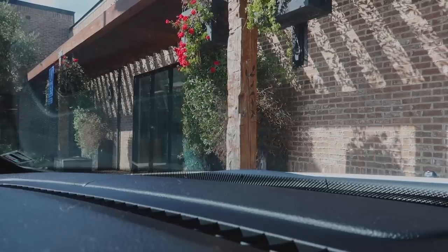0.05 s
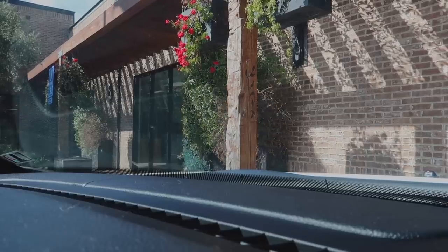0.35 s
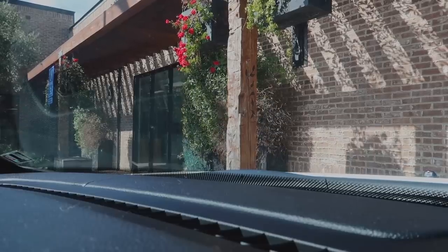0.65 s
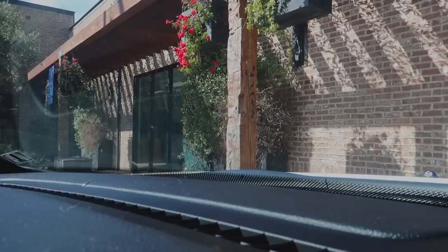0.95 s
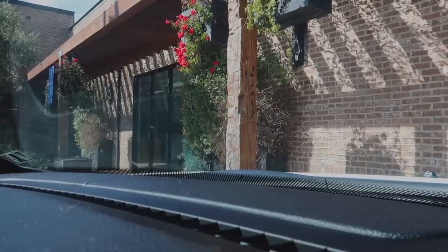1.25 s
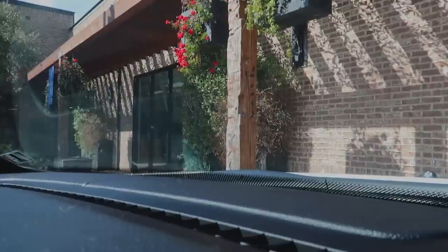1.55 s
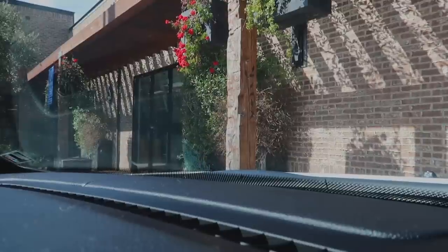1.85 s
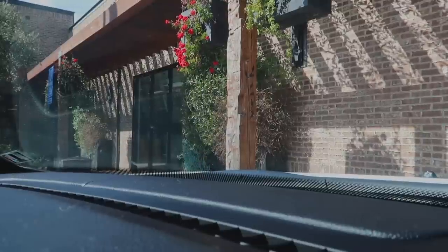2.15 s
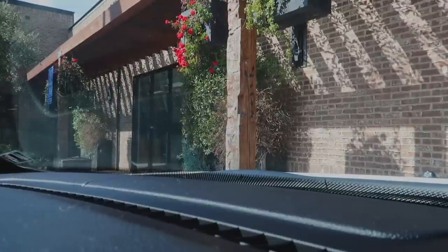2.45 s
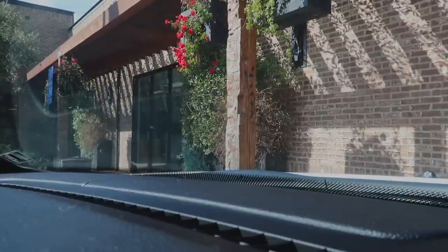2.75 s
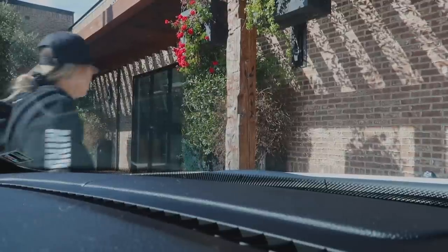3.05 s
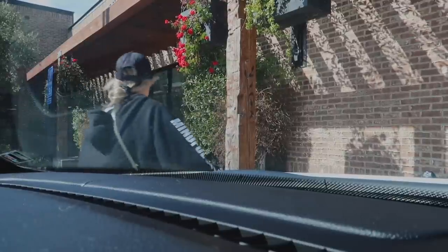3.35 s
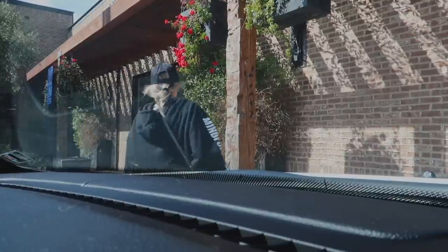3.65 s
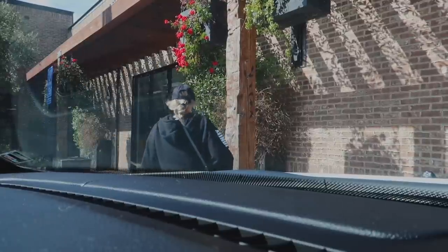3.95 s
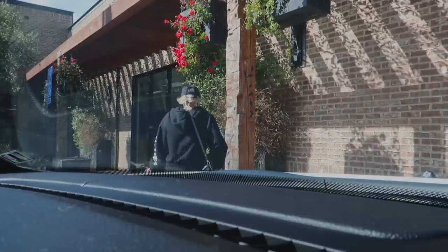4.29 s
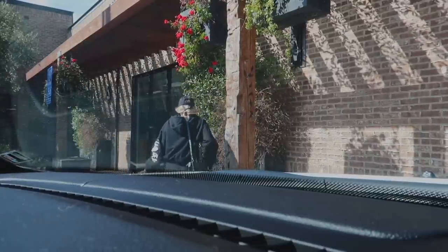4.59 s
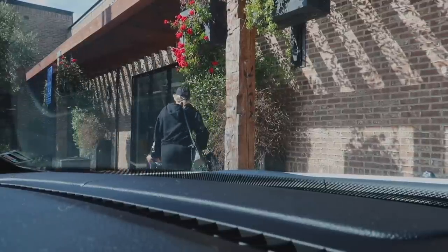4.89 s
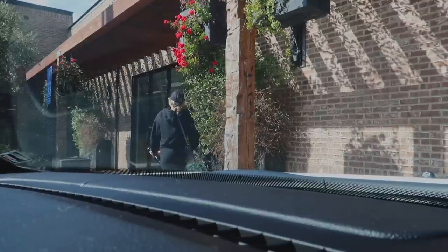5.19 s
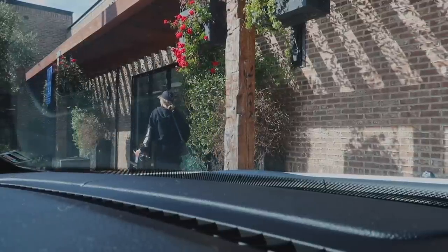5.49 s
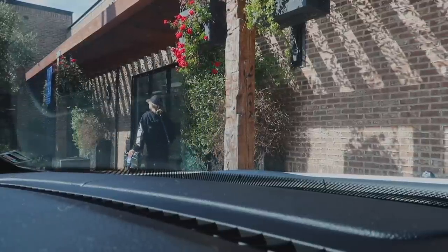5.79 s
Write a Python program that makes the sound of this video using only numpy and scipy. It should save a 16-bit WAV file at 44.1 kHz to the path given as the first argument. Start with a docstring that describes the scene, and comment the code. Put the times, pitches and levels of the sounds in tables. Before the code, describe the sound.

Soft bumps over a low engine hum, then a loud car door slam, rattling locks and a light knock, heard from inside.

```python
"""A car door slams and locks

Inside a parked car the engine idles while someone climbs out with soft bumps, brushes and squeaks.
The door slams: it pushes air in, hits its catches and sets the cabin booming. This overloads the
recorder, whose gain control turns the hum down and lets it creep back. Meanwhile the central locking
clicks, whirrs and clunks, a soft knock follows, and a low drone swells."""
import sys
import numpy as np
from scipy import signal
from scipy.fft import rfft, irfft, next_fast_len
from scipy.io import wavfile
from scipy.ndimage import uniform_filter1d, map_coordinates

SR = 44100
rng = np.random.default_rng(int(sys.argv[2]) if len(sys.argv) > 2 else 0)


def wav_record(signal):
    """Record a signal, one row per channel, as 16-bit PCM in the file named by sys.argv[1]."""
    frames = np.transpose(np.atleast_2d(signal))
    bounded = np.clip(frames, -1, 1)
    # unit amplitude maps onto the largest positive 16-bit level
    quanta = np.round(bounded * 32767).astype(np.int16)
    wavfile.write(sys.argv[1], SR, quanta)


N = 257103
TIME = np.arange(N) / SR
SHUT_S = 1.325  # the door seal closes
FIRING_HZ = 37.63  # engine puffs per second


def amp(db):
    """Turn decibels into a factor to multiply by."""
    return 10 ** (np.asarray(db) / 20)


def unit(x):
    """Scale a sound to an average strength (rms) of 1."""
    return x / np.sqrt(np.mean(x ** 2) + 1e-20)


def along(points, hz):
    """Read between (frequency, value) points, with octaves evenly spaced."""
    freqs, values = np.transpose(points)
    return np.interp(np.log(hz + 1), np.log(freqs + 1), values)


def peaks(resonances, hz):
    """Boost in dB near the frequencies at which a part likes to ring."""
    return sum(boost / (1 + (2 * (hz - centre) / width) ** 2) for centre, width, boost in resonances)


def curves(rows):
    """Join timed points into one curve for each column after the time."""
    times, *columns = np.transpose(rows)
    return [np.interp(TIME, times, column) for column in columns]


def since(s):
    """Seconds gone by since time s, zero before it."""
    return np.maximum(TIME - s, 0)


def wobble(rate):
    """A smooth curve through `rate` random values a second."""
    return map_coordinates(rng.standard_normal(int(N * rate / SR) + 4), [TIME * rate])


def add(track, s, sound):
    """Mix a sound into a track from time s."""
    part = track[..., round(s * SR):][..., :sound.shape[-1]]
    part += sound[..., :part.shape[-1]]


def filtered(x, response):
    """Multiply each frequency in x by response(hz)."""
    n = x.shape[-1]
    padded = next_fast_len(n + 8192, True)
    return irfft(rfft(x, padded) * response(np.fft.rfftfreq(padded, 1 / SR)), padded)[..., :n]


def ring_filter(level_db, size=4096):
    """A filter of energy 1 with the given tone colour that rings only after a blow."""
    cepstrum = irfft(np.log(amp(level_db(np.fft.rfftfreq(size, 1 / SR))) + 1e-6))
    cepstrum[1:size // 2] *= 2
    cepstrum[size // 2 + 1:] = 0
    response = irfft(np.exp(rfft(cepstrum)))
    return response / np.linalg.norm(response)


# how wide the cabin sounds: (frequency [Hz], stereo side minus middle [dB])
STEREO_WIDTH = [(60, -55), (200, -27.5), (500, -10.5), (1000, -6), (2000, -0.5), (4000, -1), (12000, 2)]
def rush(spectrum, wide_db):
    """Rushing noise, central in the bass and wide in the treble."""
    def gains(hz):
        level_db = along(spectrum, hz)
        return amp([level_db, level_db + along(STEREO_WIDTH, hz) + wide_db])
    mid, side = filtered(rng.standard_normal((2, N)), gains)
    return unit(np.array([mid + side, mid - side]))


# the lean towards the door: (frequency [Hz], left minus right [dB])
LEFT_LEAN = [(150, 0), (500, 1.5), (2000, 2), (5000, 1), (9000, 0)]
def from_left(x):
    """Tilt a sound towards the door on the left; the bass stays central."""
    return filtered(x, lambda hz: amp(along(LEFT_LEAN, hz) * np.array([[.5], [-.5]])))


# the cabin's echo: (frequency [Hz], fade time [s]); a fade time, or t60, is the time to drop 60 dB
ECHO_FADE = [(100, 0.99), (400, 0.23), (1500, 0.11), (5000, 0.24), (12000, 0.17)]
def cabin_echo():
    """A short wash of reflections; the upholstery soaks up treble sooner than bass."""
    hz, t, noise = signal.stft(rng.standard_normal((2, SR // 2)), SR, nperseg=256)
    mid, side = noise * amp(-60 * t / along(ECHO_FADE, hz)[:, None])
    side = side * amp(along(STEREO_WIDTH, hz))[:, None]
    return signal.istft(np.array([mid + side, mid - side]), SR, nperseg=256)[1][:, :SR // 2]


def crunch(t, t60, rise):
    """A short burst of noise, equally strong from bass to treble."""
    envelope = amp(-60 * t / t60) * (1 - np.exp(-t / rise))
    burst = rng.standard_normal(len(t)) * envelope
    power = np.abs(uniform_filter1d(np.abs(rfft(burst)) ** 2, size=150)) + 1e-12
    freqs = np.fft.rfftfreq(len(t), 1 / SR)
    flatten = ring_filter(lambda hz: -10 * np.log10(np.interp(hz, freqs, power)))
    burst = signal.fftconvolve(burst, flatten)[:len(t)]
    return burst * np.linalg.norm(envelope) / np.linalg.norm(burst)


def hits(rows, spectrum, resonances, rise_s, echo_db, left_lead_ms):
    """Each hit is a short crunch and its echo, coloured by the part that is struck."""
    out, t = np.zeros((2, N)), np.arange(SR // 2) / SR
    for s, db, bright_db, t60, bass_db in rows:
        def colour(hz):
            tilt = bright_db * np.log2(np.clip(hz, 300, 8000) / 500)
            bass = bass_db * along([(270, 1), (380, 0)], hz)
            return along(spectrum, hz) + peaks(resonances, hz) + tilt + bass
        blow = crunch(t, t60, rise_s) + amp(echo_db) * cabin_echo() * (1 - np.exp(-t / rise_s))
        add(out, s, amp(db) * signal.fftconvolve(blow, ring_filter(colour)[None], axes=1))
    return filtered(out, lambda hz: np.exp(1j * np.pi * hz * left_lead_ms / 1e3 * np.array([[1], [-1]])))


# engine and fan tones: (pitch [Hz], base level door open [dB], base level door shut [dB], waver [dB])
HUM_TONES = [(56.4, -27, -37.5, 1.5), (113.2, -28.5, -41, 4.5), (184, -40, -42.5, 6.5),
             (217.1, -17, -28.5, 1.03), (259, -40, -46.5, 5), (283.3, -34, -42.5, 2),
             (293.9, -33.5, -45.5, 3), (445.3, -38.5, -53, 3.5), (572, -57.5, -60, 8)]
# the hum swells while the door is open: (time [s], relative level [dB])
HUM_SWELL = [(0.03, -25), (0.324, -25), (0.574, -17.5), (1.156, -19.5), (1.18, -25), (1.29, -25)]
# noise through the open door: (frequency [Hz], relative level [dB])
OUTDOOR_COLOUR = [(18, -21), (45, 2.5), (70, -3.5), (100, -2.5), (170, -8), (280, -2.5), (340, -13),
                  (450, -12), (650, -19), (1200, -28), (2000, -35.5), (4000, -43), (7000, -53),
                  (11000, -61), (13000, -68), (16000, -100)]
# air from the vents in the shut cabin: (frequency [Hz], relative level [dB])
VENT_COLOUR = [(18, -20.5), (45, -1), (85, -8), (140, -2.5), (260, -4), (400, -14), (650, -23),
               (1200, -31.5), (2000, -35.5), (4000, -40.5), (7000, -47), (11000, -53), (13000, -55),
               (16000, -94.5)]
def idle():
    """Engine tones and rushing air, loud through the doorway and muffled once the door is shut."""
    shut = np.clip(.5 + (TIME - SHUT_S) / .03, 0, 1)
    swell_db = curves(HUM_SWELL)[0] + 19
    ease_db = 2.5 - 5 * since(4.26)  # the hum eases off near the end
    clock = TIME + .0004 * wobble(2.57)  # the idle speed wanders a little
    open_gain, shut_gain = (1 - shut) * amp(swell_db), shut * amp(ease_db)
    tones = np.zeros(N)
    for hz, open_db, shut_db, waver_db in HUM_TONES:
        phase = 2 * np.pi * (hz * clock + rng.random()) + 0.12 * waver_db * wobble(7.4)
        gain = amp(open_db) * open_gain + amp(shut_db) * shut_gain
        tones += gain * amp(waver_db * np.tanh(wobble(5.7))) * np.sin(phase)
    throb = 1 + 0.12 * np.sin(2 * np.pi * FIRING_HZ * clock)  # one puff per firing
    outdoors = amp(-24 + 0.45 * swell_db) * throb * rush(OUTDOOR_COLOUR, wide_db=-4.0)
    vents = amp(-34 + 0.21 * ease_db) * rush(VENT_COLOUR, wide_db=2.5)
    return tones + (1 - shut) * from_left(outdoors) + shut * vents


# the engine's deepest tone: (time [s], level [dB])
FIRING_LEVEL = [(0, -25), (.42, -18.5), (.8, -24.5), (1.05, -16.5), (1.5, -23.5), (2.35, -28.5),
                (3.95, -26), (4.12, -27), (4.55, -33.5), (4.85, -25), (5.25, -33.5), (5.4, -27)]
# the tone an octave above it: (time [s], level [dB])
OCTAVE_LEVEL = [(.7, -47), (.95, -26.5), (1.25, -31.5), (1.6, -48.5), (3.6, -55), (4.2, -32), (4.5, -36.5),
                (4.92, -28.5), (5.3, -44), (5.6, -38)]
def engine_firing():
    """The engine's firings blend into a deep tone and its octave, each swelling on its own."""
    cycles = FIRING_HZ * (TIME + .0006 * wobble(1.4))
    (firing_db,), (octave_db,) = curves(FIRING_LEVEL), curves(OCTAVE_LEVEL)
    deep = amp(firing_db + .8 * wobble(5.1)) * np.sin(2 * np.pi * cycles)
    octave = amp(octave_db + 1.5 * wobble(6)) * np.sin(2 * np.pi * (2 * cycles + rng.random()))
    return deep + octave


# upholstery squeaks: (time [s], pitch [Hz], level [dB], spread in time [s])
SEAT_SQUEAKS = [(0.202, 1870, -41, 0.016), (0.803, 1598, -38.5, 0.01)]
# clothes brush the seat: (time [s], level [dB], spread in time [s])
CLOTH_BRUSHES = [(.39, -54.5, 0.055), (0.43, -44.5, 0.015), (0.707, -54, 0.021)]
# the hiss of cloth: (frequency [Hz], relative level [dB])
CLOTH_COLOUR = [(800, -33), (1500, -10.5), (3000, -2.5), (4500, 1.5), (8000, -4), (13000, -9.5),
                (16000, -28)]
# small bumps: (time [s], scuff level [dB], brightness [dB/octave], thud pitch [Hz], thud level [dB])
SEAT_BUMPS = [(.428, -30, 3, 520, -29), (0.7826, -16.5, -3, 478, -15), (0.857, -21, -8, 505, -13),
              (.985, -20, -8, 400, -17)]
# the hollow sound of a scuff: (frequency [Hz], relative level [dB])
SEAT_COLOUR = [(100, -26), (330, -10), (430, 0), (520, -2.5), (700, -11.5), (1600, -18), (2300, -27.5),
               (3600, -28.5), (7000, -44.5), (14000, -68.5)]
def climbing_out():
    """Someone bumps the sill and seat, clothes brush past and the upholstery squeaks."""
    def bell(s, spread):
        return np.exp(-.5 * ((TIME - s) / spread) ** 2)
    brushing = sum(amp(db) * bell(s, spread) for s, db, spread in CLOTH_BRUSHES)
    squeaks = sum(amp(db) * bell(s, spread) * np.sin(2 * np.pi * hz * TIME + wobble(160))
                  for s, hz, db, spread in SEAT_SQUEAKS)
    scuff_t60, thud_rise_s = 0.045, .0019
    scuffs = [(s, db, bright_db, scuff_t60, 0) for s, db, bright_db, _, _ in SEAT_BUMPS]
    bumps = hits(scuffs, SEAT_COLOUR, [], rise_s=0.00069, echo_db=-21, left_lead_ms=0.02)
    t = np.arange(SR // 10) / SR
    age = t / thud_rise_s
    thud = age ** 2 * np.exp(-age)  # a damped panel swings only a few times
    for s, _, _, hz, db in SEAT_BUMPS:
        add(bumps, s, amp(db) * thud / thud.max() * np.sin(2 * np.pi * hz * t))
    return bumps + brushing * rush(CLOTH_COLOUR, wide_db=1.0) + squeaks


# a mid-pitched rush outside: (frequency [Hz], relative level [dB])
RUSH_COLOUR = [(400, -25.5), (800, -1), (1000, 0.5), (1350, -1), (1800, -18), (3000, -36.5), (8000, -79.5)]
# where the open doorway rings: (frequency [Hz], width [Hz], boost [dB])
DOORWAY_RING = [(520, 60, 4), (860, 110, 13), (1030, 53, 5), (1300, 130, 7.5)]
def outside_rush():
    """A soft rush swells and fades in the ringing doorway until the door cuts it off."""
    crest_s, spread_s = 0.9, 0.27
    swell = np.exp(-.5 * ((TIME - crest_s) / spread_s) ** 2)
    air = unit(filtered(rush(RUSH_COLOUR, wide_db=-9.5), lambda hz: amp(peaks(DOORWAY_RING, hz))))
    return (TIME < SHUT_S) * amp(-41 + 1.5 * wobble(14)) * swell * air


# the door meets the seal, both catches and the frame, then bounces and settles:
# (time [s], level [dB], brightness [dB/octave], fade time [s], extra bass [dB])
SLAM_HITS = [(1.303, -20, -1.5, .06, 0), (1.3208, 9, -.5, .013, -12), (1.3235, 11, -.5, .014, -10),
             (1.3368, 10.5, .7, .016, 0), (1.3413, 10.5, -2.5, .016, 5), (1.3465, -4, 2.5, .018, 0),
             (1.3685, -4.5, -1.7, .085, -1), (1.402, -11.5, -5, .31, 2), (1.481, -31, 3, .04, 1)]
# the sound of the struck door: (frequency [Hz], relative level [dB])
DOOR_COLOUR = [(25, -18.5), (60, -9), (150, -6), (290, -8), (420, -7.5), (800, -16), (1650, -20.5),
               (2600, -33.5), (4000, -38.5), (7000, -45), (12000, -47.5), (14000, -83.5)]
# where the door panel rings: (frequency [Hz], width [Hz], boost [dB])
PANEL_RING = [(187, 79, 8), (269, 50, 5), (401, 31, 4.5), (444, 24, 2), (510, 64, 3), (598, 45, 3),
              (868, 82, 10.5), (1072, 75, 9.5), (1424, 82, 9), (1666, 90, 6), (1765, 70, 5), (1900, 100, 6),
              (2270, 90, 8), (3270, 160, 5)]
# the cabin air and car body boom: (pitch [Hz], relative level [dB], fade time [s], rise time [s])
CABIN_BOOM = [(27, 1, 1.8, 0.17), (40, -3, 1.5, .1), (48.4, 7, 1.2, 0.15), (75, 6.5, .7, 0.1),
              (105, 2, 0.55, 0.068), (172, 6, .66, 0.3), (275, -1, .3, .03)]
def door_slam():
    """The door pushes air into the cabin, hits its catches and sets panel and cabin ringing."""
    out = hits(SLAM_HITS, DOOR_COLOUR, PANEL_RING, rise_s=0.00051, echo_db=-23, left_lead_ms=0.03)
    t = np.arange(2 * SR) / SR
    push_rise_s, boom_s, left_lead_ms = .0034, 1.335, .35
    age = t / push_rise_s
    push = amp(2.5) * age ** 2 * (3 - age) * np.exp(-age)  # pressure rises, then swings below rest
    add(out, 1.2935, push)  # air driven ahead of the door
    add(out, 1.339, push)  # a second push as the seal is squeezed
    for hz, db, t60, rise in CABIN_BOOM:
        stereo_phase = np.pi * hz * left_lead_ms / 1e3 * np.array([[1], [-1]])
        envelope = amp(db - 60 * t / t60) * (1 - np.exp(-t / rise))
        add(out, boom_s, envelope * np.sin(2 * np.pi * hz * t + stereo_phase))
    return out


LOCK_ON_S, LOCK_OFF_S = 2.149, 2.359  # the relay, an electric switch, feeds the lock motor
# the relay's steel tick: (frequency [Hz], relative level [dB])
STEEL_COLOUR = [(1000, -25), (3000, -5.5), (7000, -7), (11000, -14.5), (14000, -27)]
# where the relay rings: (frequency [Hz], width [Hz], boost [dB])
RELAY_RING = [(3520, 480, 19), (4880, 650, 14), (6380, 450, 14.5), (11700, 700, 6)]
# extra ring as it springs back: (frequency [Hz], width [Hz], boost [dB])
SPRING_RING = [(3470, 250, 4), (15200, 900, 20)]
# the latches clunk home: (time [s], level [dB], brightness [dB/octave], extra bass [dB])
LATCH_HITS = [(2.1994, -4, -2, -3), (2.2082, -4, -2, -3), (2.218, -8, 4.5, -2), (2.2229, 5, 4, -0.5),
              (2.2265, 1, 2, 0.5), (2.2308, 1.5, 2.5, 2), (2.2385, -2, -0.5, 1), (2.2453, 3.5, 3, 1),
              (2.2533, 2.5, 1.5, 3), (2.262, 3.5, 2.5, 3), (2.2754, 4, 2, 3), (2.2867, 1, 2, 2),
              (2.296, 0, -3.5, -3), (2.3086, -7, 1, 0), (2.3186, -7, -1, 4), (2.3428, -16, 1.5, 1)]
# the sound of latches and rods: (frequency [Hz], relative level [dB])
LATCH_COLOUR = [(40, -15), (100, 1), (170, 0.5), (285, 5), (450, 0), (700, -9.5), (1300, -16.5),
                (2200, -24.5), (3300, -34.5), (5000, -49.5), (7000, -60.5), (11000, -63), (15000, -91)]
# where the lock housing and trim ring: (frequency [Hz], width [Hz], boost [dB])
HOUSING_RING = [(414, 25, 3.5), (507, 40, 4.5), (590, 35, 3), (857, 60, 7), (1080, 70, 3), (1446, 46, 5),
                (1770, 170, 7), (2720, 300, 5.5), (3700, 260, 5)]
def central_locking():
    """The relay ticks on, rods rattle while the latches go home, and the relay ticks off."""
    tick_t60, latch_t60, rod_t60 = 0.042, 0.042, 0.11
    rods_per_s, rods_end_s = 60, 2.3
    ticks = [(LOCK_ON_S, -20.5, RELAY_RING), (LOCK_OFF_S, -28.5, RELAY_RING + SPRING_RING)]
    relay = sum(hits([(s, db, 0, tick_t60, 0)], STEEL_COLOUR, ring,
                     rise_s=0.0016, echo_db=-16, left_lead_ms=0.042) for s, db, ring in ticks)
    # the rods take up their slack and later let go: (time [s], level [dB], brightness [dB/octave])
    rods = [(2.132, -29, 2), (LOCK_OFF_S, -15.5, -3)]
    for s in np.arange(LOCK_ON_S, rods_end_s, 1 / rods_per_s):
        rods.append((s + rng.random() / (2 * rods_per_s), rng.normal(-12.5, 2), 2))
    clunks = [(s, db, bright_db, latch_t60, bass_db) for s, db, bright_db, bass_db in LATCH_HITS]
    clunks += [(*row, rod_t60, 0) for row in rods]
    return relay + hits(clunks, LATCH_COLOUR, HOUSING_RING,
                        rise_s=0.00046, echo_db=-21, left_lead_ms=0.036)


# the motor's whirr and the faint tone after it: (time [s], pitch [Hz], relative level [dB])
WHIRR_PATH = [(2.149, 520, -30), (2.165, 497, -25.5), (2.173, 424.6, -18.5), (2.187, 412, -18.5),
              (2.215, 412, -28), (2.345, 384.8, -42), (2.371, 412, -31), (2.41, 407.5, -44),
              (2.53, 407, -44)]
# the tones in the whirr: (multiple of the pitch, relative level [dB])
WHIRR_TONES = [(1, -2), (1.5, -11), (2, -14), (3, -19), (4, -22), (6, -30)]
def lock_motor():
    """A small geared motor whirrs and slows; a faint tone rings on in the cabin, then fades."""
    pitch_hz, level_db = curves(WHIRR_PATH)
    cycles = np.cumsum(pitch_hz * (1 + .04 * wobble(200))) / SR
    tilt_db = .25 * (level_db - level_db.max())  # brighter when louder
    whirr = sum(amp(db + tilt_db * np.log2(k)) * np.sin(2 * np.pi * (k * cycles + rng.random()))
                for k, db in WHIRR_TONES)
    fade_in = 1 - np.exp(-since(LOCK_ON_S) / 0.002)
    fade_out_db = -60 * since(WHIRR_PATH[-1][0]) / .12
    chatter_db = 2.6 * wobble(260)
    return fade_in * amp(16.5 + level_db + fade_out_db + chatter_db) * whirr


# one soft knock with its lead-in: (time [s], level [dB], brightness [dB/octave])
KNOCK_HITS = [(2.504, -22.5, 0), (2.513, -21, -4), (2.530, -21.5, 4.5), (2.5415, -11.5, -3)]
# the sound of the knock: (frequency [Hz], relative level [dB])
KNOCK_COLOUR = [(100, -6), (300, -3.5), (600, 2), (900, -2.5), (1500, -12), (2500, -28), (3800, -27.5),
                (4700, -24), (6000, -45), (11000, -39), (15000, -55)]
# the knocked panel's tones: (pitch [Hz], level relative to the hit [dB], fade time [s])
PANEL_TONES = [(225, -18, .11), (619, -15, .06), (861, -24, 0.15), (1420, -27.5, .08), (1820, -39, .07)]
def knock():
    """A light knock on the car body sets a panel ringing."""
    hit_t60, rise_s = 0.075, 0.002
    taps = [(*row, hit_t60, 0) for row in KNOCK_HITS]
    out = hits(taps, KNOCK_COLOUR, [], rise_s, echo_db=-17.0, left_lead_ms=0.039)
    t = np.arange(SR // 2) / SR
    for s, db, _ in KNOCK_HITS:
        ring = sum(amp(level - 60 * t / t60) * np.sin(2 * np.pi * (hz * t + rng.random()))
                   for hz, level, t60 in PANEL_TONES)
        add(out, s, amp(db) * (1 - np.exp(-t / rise_s)) * ring)
    return out


# a drone in the shut cabin: (time [s], pitch [Hz], level [dB])
DRONE_PATH = [(2.9, 115.4, -47.5), (3.33, 116.4, -32), (3.62, 123.2, -28.5), (3.85, 124, -41),
              (4.15, 128, -30.5), (4.9, 135.6, -26.5), (5.05, 134.2, -36.5), (5.2, 132.8, -29.5),
              (5.75, 127.4, -28)]
def drone():
    """A low, wavering tone, faint at first, comes in swells as its pitch drifts up and back down."""
    pitch_hz, level_db = curves(DRONE_PATH)
    tone = np.sin(2 * np.pi * np.cumsum(pitch_hz) / SR)
    return (TIME > SHUT_S) * amp(level_db + 1.6 * wobble(8)) * tone


def scene():
    """Everything heard at the dashboard."""
    hum = idle() + engine_firing() + drone()
    doorway = from_left(climbing_out() + door_slam() + outside_rush())
    return hum + doorway + lock_motor() + central_locking() + knock()


def gain_control(x, limit, hold_s, fall_db_per_s, rise_db_per_s, depth_db, block=128):
    """A peak over the limit turns the volume down for a while; then it creeps back."""
    starts, step_s = np.arange(0, N, block), block / SR
    block_peaks = np.maximum.reduceat(np.abs(x).max(0), starts)
    gain_db, until_s, gains_db = 0, -1, []
    for s, peak in zip(starts / SR, block_peaks):
        if peak * amp(gain_db) > limit:
            until_s = s + hold_s
        if s < until_s:
            gain_db = max(gain_db - fall_db_per_s * step_s, -depth_db)
        else:
            gain_db = min(gain_db + rise_db_per_s * step_s, 0)
        gains_db.append(gain_db)
    return x * amp(np.interp(TIME, starts / SR, gains_db))


def record(dry):
    """The recorder turns down after an overload, clips the peaks and cuts the highest treble."""
    ducked = gain_control(dry, limit=1.1, hold_s=0.43, fall_db_per_s=109.5, rise_db_per_s=9, depth_db=22)
    top_hz = 16000
    return filtered(np.clip(ducked, -1, 1), lambda hz: 1 / (1 + (hz / top_hz) ** 60))


dry = scene()
out = record(dry)
wav_record(out)
```